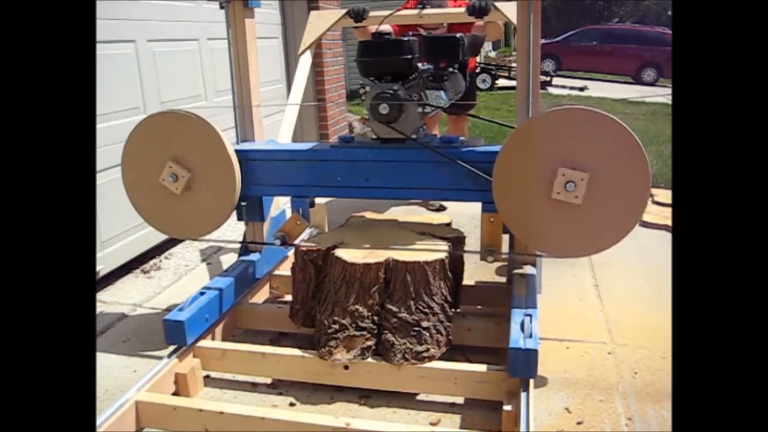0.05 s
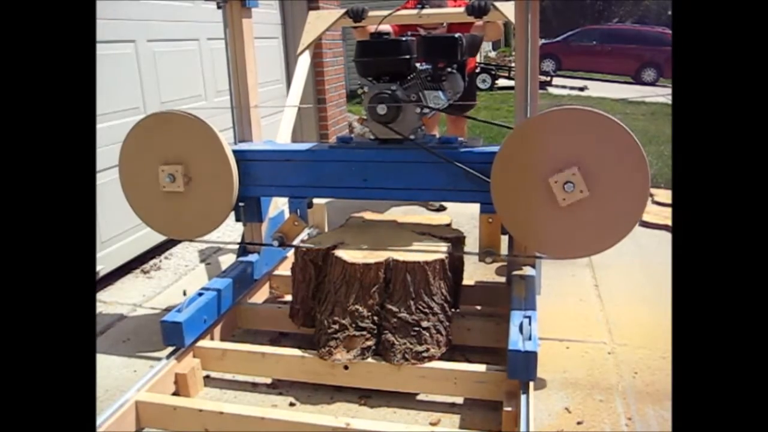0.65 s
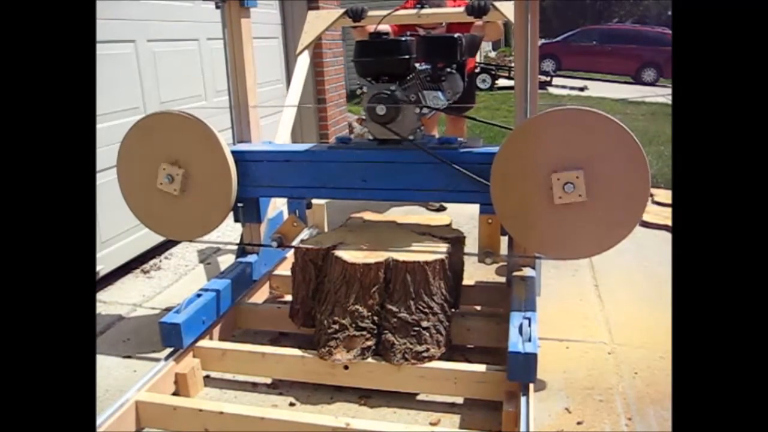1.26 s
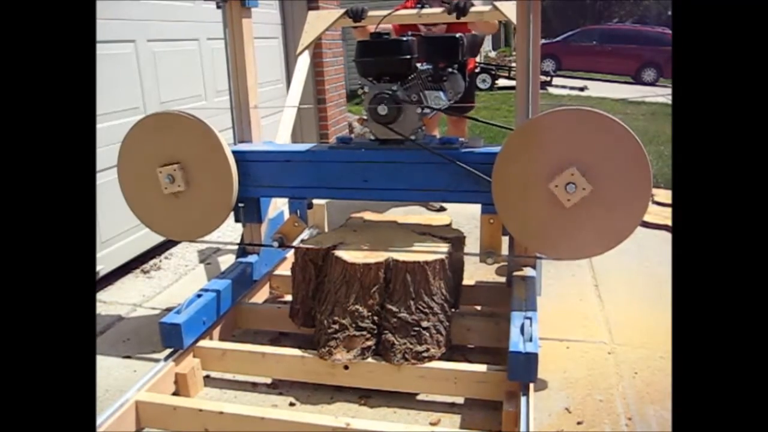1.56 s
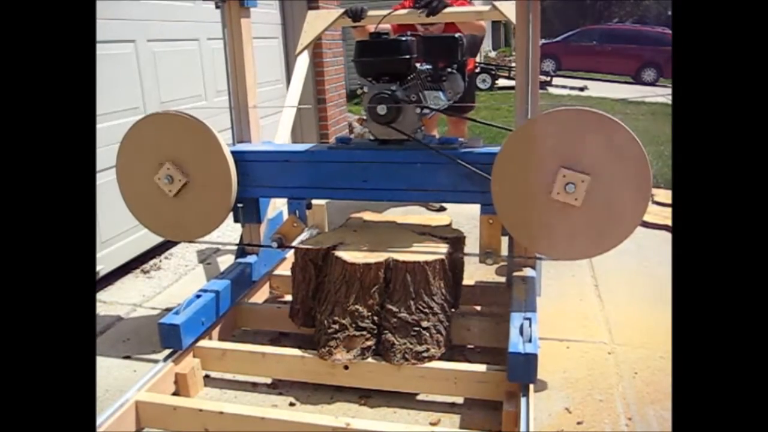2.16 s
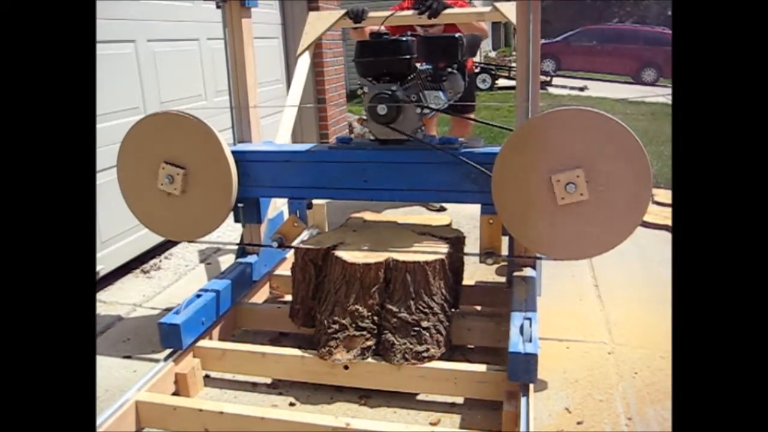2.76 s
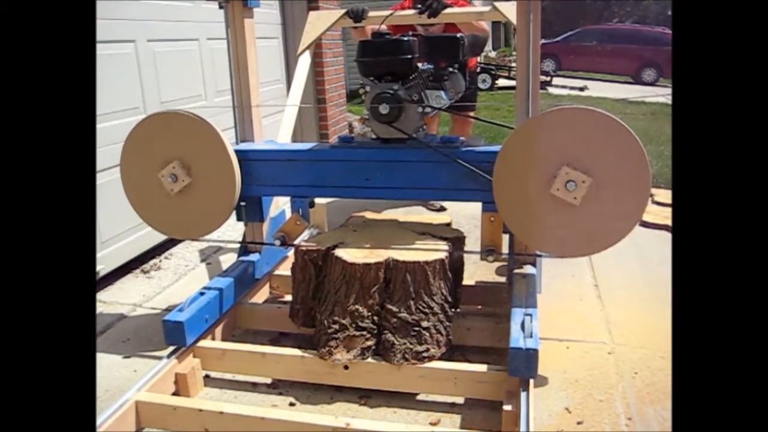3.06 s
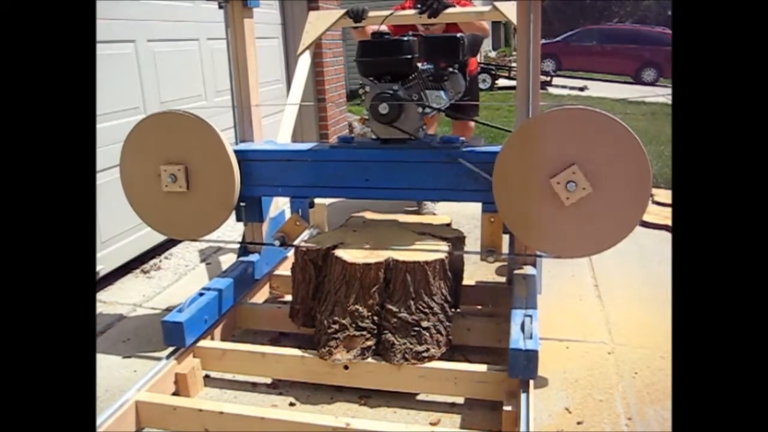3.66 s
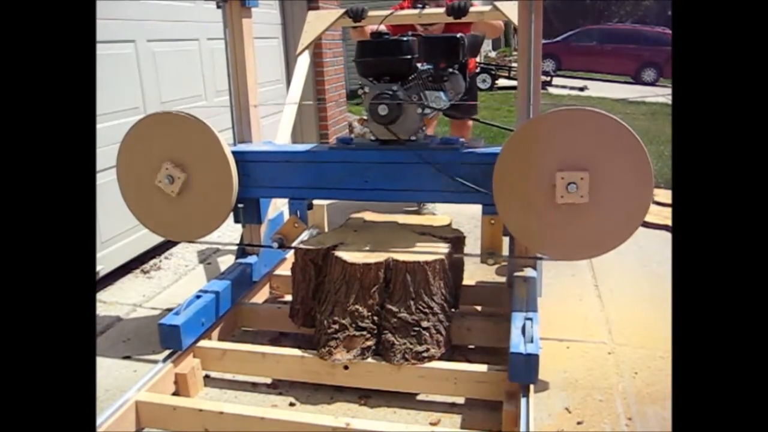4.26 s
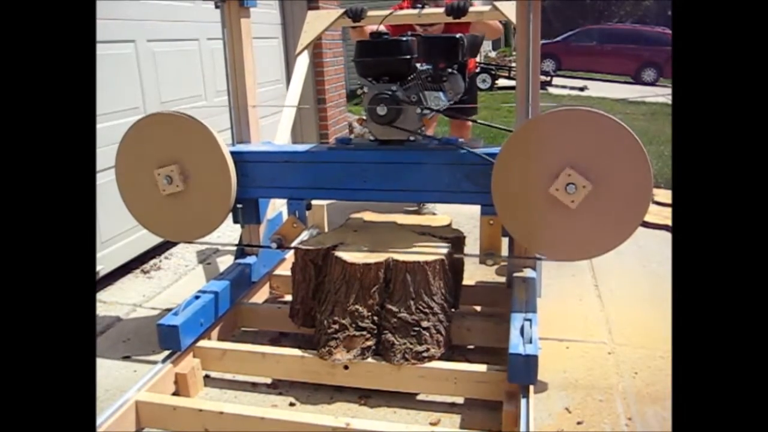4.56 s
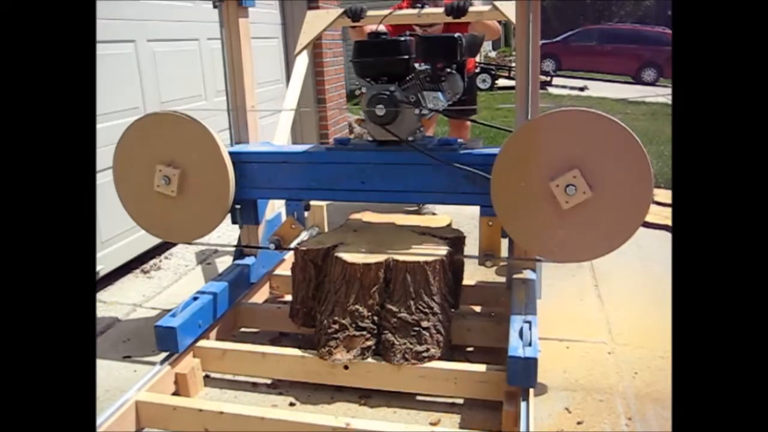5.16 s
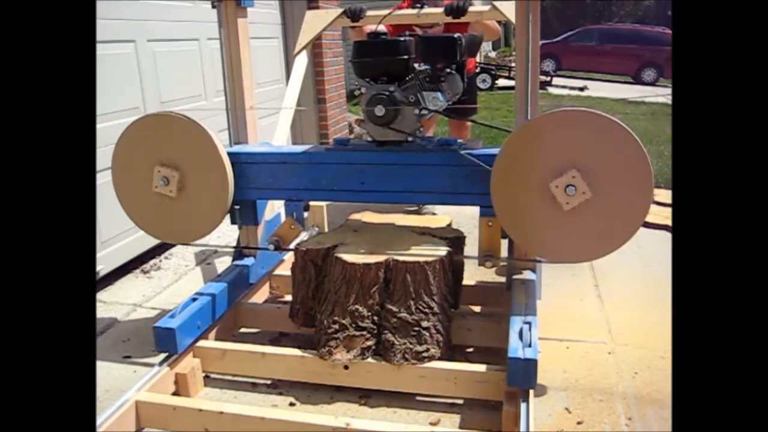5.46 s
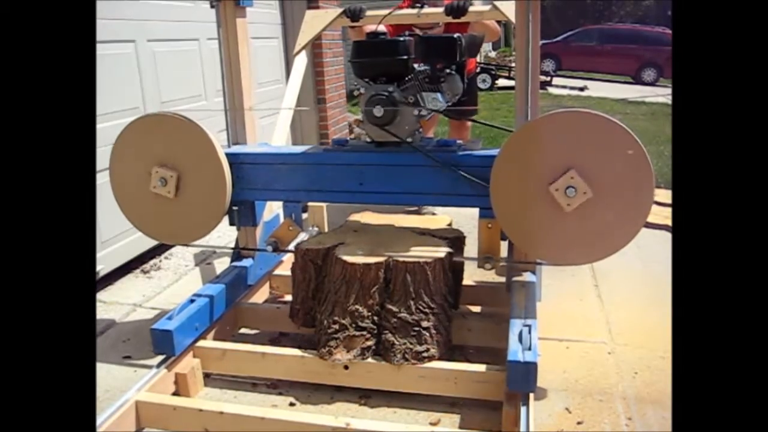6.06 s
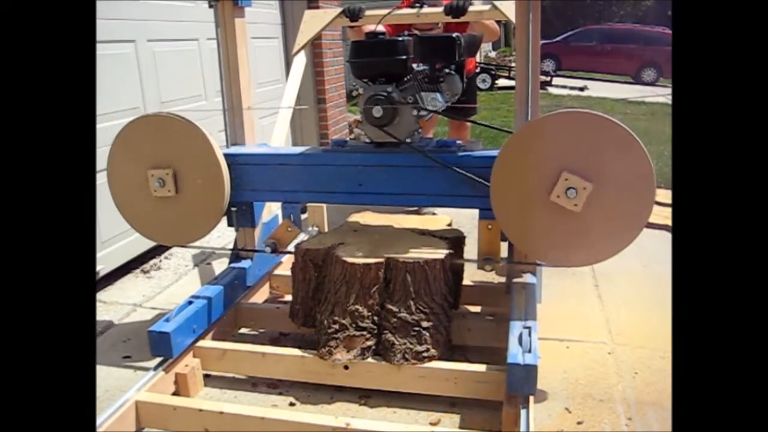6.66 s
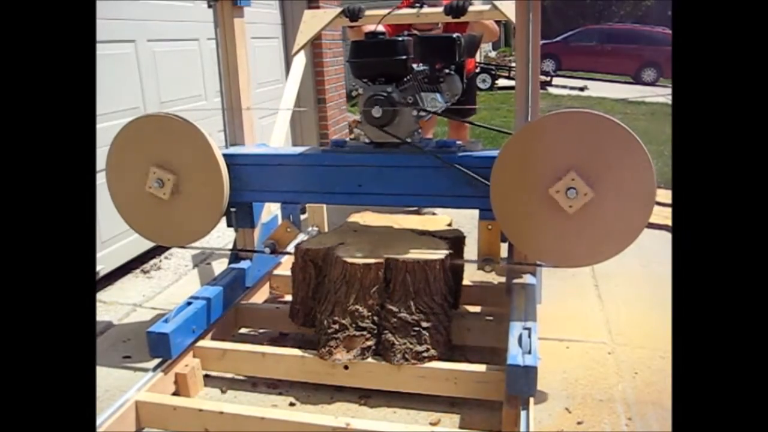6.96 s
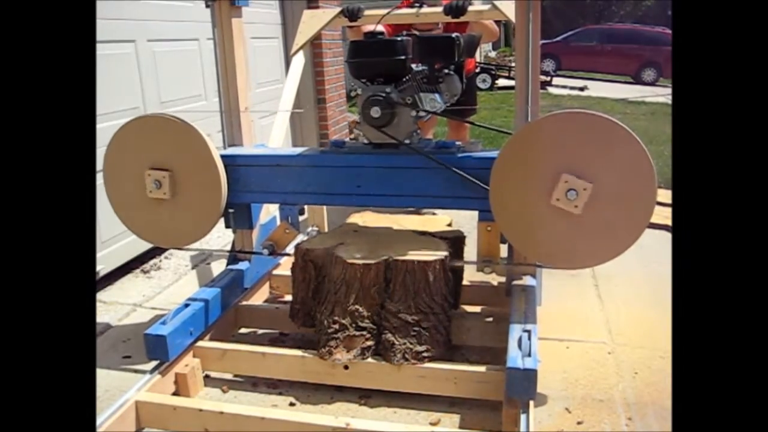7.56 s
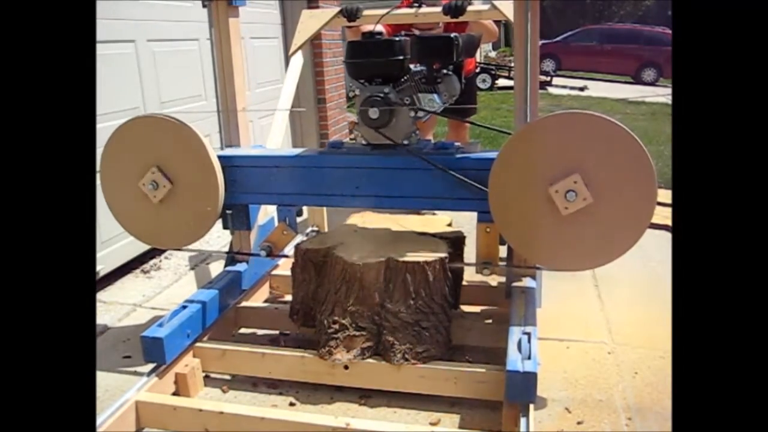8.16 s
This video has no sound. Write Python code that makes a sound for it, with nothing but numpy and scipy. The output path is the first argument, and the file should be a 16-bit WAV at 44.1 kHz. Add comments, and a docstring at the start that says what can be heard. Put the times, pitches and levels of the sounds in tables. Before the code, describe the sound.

A small single-cylinder petrol engine pops and clatters close by outdoors, driving a band saw through a log. From the start the steel blade hisses, rasps and rings, with brief high squeals and short knocks. A scrape sinks in pitch from about 0.6 to 1.3 seconds, followed by two bright skids. Around 1.8 seconds another falling scrape begins and the engine slows. From 2.2 to 2.6 seconds the blade binds: the hiss drops away, wood crunches, the steel squeals and knocks, and the engine nearly stalls before picking up. A bright rubbing hiss follows until about 4.5 seconds, easing into smoother cutting with a thin, high whine. The engine gradually regains full speed under the hiss, and scattered light knocks and an occasional squeak continue until the end at about 8.3 seconds.

```python
"""Engine-driven band saw in a log

A single-cylinder four-stroke petrol engine pops and clatters outdoors, driving a wooden band saw.
Tooth impacts and friction make the steel band hiss and ring; it skids with a brighter rub, and once binds:
it knocks, squeals and drags the engine almost to a stall before the speed comes back.
A fast gain control holds the level: the engine ducks under each skid and swells when the hiss dies."""
import sys
import numpy as np
from scipy import signal
from scipy.fft import rfft, irfft
from scipy.io import wavfile
from scipy.ndimage import minimum_filter1d, map_coordinates

SR = 44100
rng = np.random.default_rng(int(sys.argv[2]) if len(sys.argv) > 2 else 0)


def unload_audio(sound):
    """Save the sound as a 16-bit wav file, at the path given as the first command line argument."""
    columns = np.transpose(np.atleast_2d(sound))
    # keep every value between -1 and 1, then stretch to whole-number steps
    steps = np.round(np.clip(columns, -1, 1) * 32767)
    wavfile.write(sys.argv[1], SR, steps.astype(np.int16))


N = 366912
TIME = np.arange(N) / SR


def from_db(db):
    """Amplitude ratio of a level in decibels."""
    return 10 ** (np.asarray(db) / 20)


def unit_rms(x):
    """Normalisation to unit power."""
    return x / np.sqrt(np.mean(x ** 2) + 1e-20)


def curves(rows):
    """Linear interpolation of each column against the first, time, at every sample."""
    times, *columns = np.transpose(rows)
    return [np.interp(TIME, times, column) for column in columns]


def trapezoid(start, end, attack_s, release_s):
    """Trapezoidal envelope: rises towards 1 from start and releases from end."""
    return np.clip(np.minimum((TIME - start) / attack_s, 1 - (TIME - end) / release_s), 0, 1)


def lagged(x, seconds, start=0):
    """First-order lag: exponential relaxation towards x."""
    keep = np.exp(-1 / (seconds * SR))
    return signal.lfilter([1 - keep], [1, -keep], x, zi=[keep * start])[0]


def drift(rate):
    """Smooth random modulation of unit power, changing about rate times a second."""
    knots = rng.standard_normal(8192)
    coarse = TIME[::int(SR / (12 * rate)) + 1]
    spline = map_coordinates(knots, [coarse * rate], order=3, mode="wrap")
    return unit_rms(np.interp(TIME, coarse, spline))


def grains(per_s, spread_db):
    """Shot noise: dense, tiny impacts of uneven size."""
    sizes = from_db(spread_db * np.minimum(rng.exponential(1, N), 4)) * rng.choice([-1, 1], N)
    return unit_rms(sizes * (rng.random(N) < per_s / SR))


def narrow_noise(hz, width_hz):
    """Narrow-band noise: a randomly driven resonance whose centre may move."""
    lowpass = signal.butter(2, width_hz / 2, fs=SR, output="sos")
    envelope = signal.sosfilt(lowpass, rng.standard_normal(N) + 1j * rng.standard_normal(N))
    carrier = np.exp(2j * np.pi * np.cumsum(hz * np.ones(N)) / SR)
    return unit_rms((envelope * carrier).real)


def lift_db(hz, modes):
    """Lorentzian resonance peaks in decibels; a negative lift is a notch."""
    return sum(lift / (1 + (2 * (hz - centre) / width) ** 2) for centre, width, lift in modes)


def body(x, spectrum, modes=(), size=8192):
    """Source-filter model: a minimum-phase body with broad colour and narrow resonances; unit power."""
    hz = np.maximum(np.fft.rfftfreq(size, 1 / SR), 1)
    points_hz, points_db = np.transpose(spectrum)
    db = np.interp(np.log(hz), np.log(points_hz), points_db) + lift_db(hz, modes)
    gain = from_db(db) * np.minimum(hz / points_hz[0], 1)   # long waves are hardly radiated
    cepstrum = irfft(np.log(gain))[:size // 2]
    response = irfft(np.exp(rfft(2 * cepstrum, size)))[:size // 2]
    return unit_rms(signal.oaconvolve(x, response)[:N])


def pings(times, modes, decay_s, spread_db, detune):
    """Damped free vibration: each light contact rings one mode at random; unit power."""
    age = TIME[:SR // 16]
    decay = np.exp(-age / decay_s)
    out = np.zeros(N + len(age))
    for t, (pick, size, shift) in zip(times, rng.random((len(times), 3))):
        start = int(t * SR)
        hz = modes[int(pick * len(modes))][0] * (1 + detune * (2 * shift - 1))
        out[start:start + len(age)] += from_db(spread_db * size) * decay * np.sin(2 * np.pi * hz * age)
    return unit_rms(out[:N])


# Firing rate of the engine: t/s, f/Hz
FIRING_RATE = [(0.0, 23.88), (1.8, 21.25), (2.25, 13.3), (2.43, 13.32), (2.5, 21.81), (2.75, 21.24),
               (3.48, 20.96), (3.71, 22.47), (4.2, 21.58), (4.72, 21.56), (4.94, 22.57), (5.12, 22.45),
               (5.61, 23.48), (5.82, 22.9), (6.45, 23.76), (7.05, 23.99), (7.85, 23.87), (8.32, 24.2)]
def engine_motion():
    """Phase is the integral of frequency: the firing rate and the running count of engine cycles."""
    firing_hz, = curves(FIRING_RATE)
    return firing_hz, np.cumsum(firing_hz) / SR - 0.13


def labouring(firing_hz):
    """Load slows the engine: 0 while it runs easily, 1 close to the stall."""
    return np.clip((21.5 - firing_hz) / 3.8, 0, 1)


def surge(cycles, at, depth_db):
    """Amplitude modulation by the power stroke, peaking at the given fraction of each cycle."""
    return from_db(depth_db * np.cos(2 * np.pi * (cycles - at)))


# Puffs and valve knocks within one cycle: phase/cycles, level/dB, decay/cycles
STROKE_PULSES = [(.2, -2, 0.22), (.47, -23, 0.085), (.66, -7, 0.064), (0.961, -7, 0.17)]
def strokes(cycles, uneven_db):
    """Cycle-to-cycle variation: an envelope of decaying pulses, each of slightly different strength."""
    out = 0
    for at, db, decay in STROKE_PULSES:
        cycle, age = np.divmod(cycles - at, 1)
        strength = from_db(db + uneven_db * rng.uniform(-1, 1, 512))
        out = out + strength[cycle.astype(int)] * np.exp(-age / decay)
    return out


# Modes of the wooden frame: f/Hz, relative level/dB, decay/s
WOOD_MODES = [(128, -13, 0.018), (168, -8, 0.012), (202, -17, 0.014), (354, -9, 0.013)]
def thumps(cycles, firing_hz):
    """Impulse response: near the stall each firing is a separate blow on the frame."""
    age = TIME[:SR // 5]
    ring = sum(from_db(db) * np.exp(-age / decay) * np.sin(2 * np.pi * hz * age)
               for hz, db, decay in WOOD_MODES)
    firings = np.diff(np.floor(cycles), prepend=np.floor(cycles[0]))
    return from_db(-44) * signal.oaconvolve(firings * labouring(firing_hz) ** 2, ring)[:N]


# Throttle position: t/s, opening (0 shut, 1 wide open)
THROTTLE_OPENING = [(0, 0.95), (.5, 0.63), (.9, 0.87), (2.55, 1), (2.7, 0), (3.45, 0.05), (3.65, 0.87),
                    (4.2, 1), (5.3, 0.95), (6.3, 0.84)]
# Harmonics of the firing rate: order, relative level/dB with the throttle shut, half open, wide open
EXHAUST_HARMONICS = [(1, -24, -27, -28), (2, -12, -12.5, -11.5), (3, -19, -28, -20), (4, -20, -23, -25),
                     (5, -16, -14, -20), (6, -11, -13, -13), (7, -16, -19.5, -15), (8, -9.5, -11.5, -15),
                     (9, -13, -17, -16.5), (10, -20, -22.5, -7.5), (11, -13, -13.5, -10),
                     (12, -21, -14.5, -12), (13, -22, -18, -8.5), (14, -14.5, -6.5, -12),
                     (15, -18, -14, -22), (16, -11, -12, -18.5), (17, -23, -9, -11), (18, -17, -12, -18),
                     (19, -34, -11.5, -15), (20, -18, -19, -15), (21, -23, -12, -18), (22, -16, -19, -33),
                     (23, -10, -6, -12.5), (24, -25, -6, -12)]
# Muffler resonances: f/Hz, width/Hz, lift/dB
MUFFLER_RESONANCES = [(171, 20, 3), (380, 20, 8.5), (485, 36, 2.5)]
# Spectrum of the escaping gas: f/Hz, relative level/dB
PUFF_SPECTRUM = [(60, -13), (110, -20), (180, -8), (280, -8.5), (390, -0.5), (500, 5), (650, -8.5),
                 (1000, -2), (2500, -43)]
def exhaust(cycles, firing_hz):
    """Periodic pops form a harmonic series that sweeps through the muffler resonances, over puffs."""
    step = 8   # samples per computed point of the note
    phase = (cycles - 0.97 + 0.0018 * drift(25))[::step]   # zero as the exhaust valve opens
    throttle = curves(THROTTLE_OPENING)[0][::step]
    note = 0
    for order, *levels_db in EXHAUST_HARMONICS:
        lag = 0.34 * rng.uniform(-0.82, 1)   # the pipe smears the harmonics, in periods
        db = np.interp(throttle, [0, 0.5, 1], levels_db)
        db += lift_db(order * firing_hz[::step], MUFFLER_RESONANCES)
        db += 1.5 * (order > 2) * drift(5)[::step]
        note = note + from_db(db) * np.cos(2 * np.pi * (order * phase + lag))
    note = unit_rms(np.interp(TIME, TIME[::step], note))
    puffs = body(rng.standard_normal(N) * (strokes(cycles, uneven_db=2) + 0.34), PUFF_SPECTRUM)
    return from_db(-1.5 - 9 * labouring(firing_hz)) * note + from_db(-5) * puffs


# Spectrum radiated by the engine's shell: f/Hz, relative level/dB
SHELL_SPECTRUM = [(200, -30), (500, -11), (750, -1.5), (1100, -2), (1700, 0.5), (2300, -3.5), (3200, -0.5),
                  (4200, -5.5), (7000, -15), (15000, -43)]
# Modes of the shell: f/Hz, width/Hz, lift/dB
SHELL_MODES = [(1035, 68, 3.5), (1186, 56, 5.5), (1433, 21, 3.5), (2020, 10, 3.5), (2100, 59, 6.5),
               (2286, 58, 1.5), (2475, 320, 5), (2930, 99, 3)]
def clatter(cycles):
    """Structure-borne sound: valve gear, belt and frame shake the shell, hardest on the power stroke."""
    force = surge(cycles, at=0.64, depth_db=1.5) * (2.5 + 0.4 * strokes(cycles, uneven_db=3))
    force *= from_db(0.81 * drift(70))
    return body(grains(per_s=7000, spread_db=2) * force, SHELL_SPECTRUM, SHELL_MODES)


def rattle(cycles, at=(0.52, 0.7, 0.77, 0.84), looseness=0.02966):
    """Quasi-periodic impacts: tappets and loose guards tick at much the same points of every cycle."""
    due = (np.arange(int(cycles[-1]))[:, None] + np.array(at)).ravel()
    times = np.interp(due + looseness * rng.standard_normal(len(due)), cycles, TIME)
    return pings(times, SHELL_MODES[1:], decay_s=0.0066, spread_db=2.5, detune=0.043)


# Effort of the engine: t/s, exhaust level/dB, clatter level/dB
ENGINE_LEVELS = [(0, -49, -39), (.9, -51, -40.5), (1.25, -49, -37.5), (1.8, -50, -40.5),
                 (2.0, -48.5, -40.5), (2.3, -55, -42), (2.5, -49, -45), (2.545, -52, -38.5),
                 (2.58, -51, -43), (2.7, -53.5, -41.5), (3.35, -55, -41.5), (3.65, -52.5, -41),
                 (4.15, -53, -39.5), (5, -51.5, -39.5), (8.32, -51, -40)]
def engine(cycles, firing_hz):
    """Superposition of airborne exhaust noise and structure-borne mechanical noise."""
    exhaust_db, clatter_db = curves(ENGINE_LEVELS)
    pops = from_db(exhaust_db) * exhaust(cycles, firing_hz)
    mechanics = from_db(clatter_db) * (clatter(cycles) + from_db(-10.5) * rattle(cycles))
    return pops + mechanics + thumps(cycles, firing_hz)


# The kerf pinches the band: start t/s, end t/s, first f/Hz, final f/Hz, level/dB
KERF_PINCHES = [(0.596, 1.277, 5160, 2537, -46), (1.783, 2.231, 4500, 2710, -42.5)]
def pinch():
    """Sliding friction: wood closing on the band scrapes at a pitch that sinks faster and faster."""
    out = 0
    for start, end, first_hz, final_hz, db in KERF_PINCHES:
        closed = np.clip((TIME - start) / (end - start), 0, 1)
        hz = first_hz + (final_hz - first_hz) * closed ** 3.2
        envelope = from_db(db) * trapezoid(start, end, attack_s=0.23, release_s=0.022)
        out = out + envelope * narrow_noise(hz, width_hz=710)
    return out


# Squeals of the band: start t/s, end t/s, f/Hz, level/dB, waver as a fraction of f
BAND_SQUEALS = [(0.144, 0.18, 11500, -49, .002), (.555, 0.602, 7490, -44, .002),
                (.59, 0.638, 11300, -43, .002), (0.78, .9, 7430, -41, .004), (0.8, 0.823, 4920, -32, 0.016),
                (0.882, 0.91, 5050, -38, .008), (1.0, 1.08, 7450, -42, .002),
                (1.066, 1.12, 5210, -39, .005), (1.133, 1.153, 5200, -41, .005),
                (1.208, 1.25, 3030, -36.5, 0.055), (1.928, 1.95, 13500, -36, .012),
                (1.17, 1.255, 5000, -44.5, 0.0063), (2.317, 2.41, 6430, -48, 0.00086),
                (2.405, 2.474, 6410, -45, 0.0012), (2.47, 2.513, 6400, -46, 0.0033),
                (2.282, 2.483, 12100, -59, .007), (2.462, 2.494, 8800, -44, 0.005),
                (2.46, 2.487, 9330, -51, .008), (3.56, 3.6, 2520, -44, .008), (3.67, 3.7, 2520, -53, .008),
                (3.8, 3.85, 2540, -48, .008), (5.87, 5.923, 4830, -44, 0.01),
                (7.011, 7.047, 2890, -38, 0.0063)]
def squeals(edge_s=0.0081):
    """Stick-slip oscillation locks briefly on to one mode of the band."""
    out, slip, grip = np.zeros(N), drift(230), from_db(2 * drift(50))
    for start, end, hz, db, waver in BAND_SQUEALS:
        span = slice(int(start * SR), int(end * SR))
        phase = 2 * np.pi * np.cumsum(hz * (1 + waver * slip[span])) / SR
        envelope = from_db(db) * trapezoid(start, end - edge_s, edge_s, edge_s)[span]
        out[span] += envelope * np.sqrt(2) * np.sin(phase)
    return out * grip


# Snagging teeth: t/s, relative thud level/dB, relative spit level/dB, decay/s
TOOTH_SNAGS = [(.226, -25, -38, .005), (.718, -27, -39, .005), (0.763, -28, -38, .005),
               (.98, -24, -39, 0.0062), (1.096, -24, -36, 0.0037), (1.111, -36, -18.5, 0.0041),
               (1.16, -29, -29, 0.0094), (1.296, -25, -28, .004), (1.431, -34, -15, .0057),
               (1.478, -33, -17.5, 0.0029), (1.521, -29, -31, .005), (1.618, -34, -17.5, 0.0046),
               (1.856, -31, -42, 0.0062), (2.264, -14, -28, 0.0013), (2.401, -26, -54, 0.0024),
               (2.511, -24, -21, 0.005), (2.569, -46, -37, .0091), (2.619, -37, -31, 0.0028),
               (3.525, -43, -24, .003), (4.157, -37, -15.5, .0025), (4.5, -40, -29, 0.0027),
               (4.784, -33, -23, .0025), (5.302, -23, -40, .003), (5.994, -26, -40, .004),
               (6.493, -30, -40, 0.0031), (6.631, -24.5, -40, .0034), (6.672, -25, -40, 0.0022),
               (6.799, -28, -32, 0.0043), (6.836, -27, -42, .005), (6.877, -23, -42, .002),
               (7.04, -28, -42, 0.0031), (7.585, -33, -40, 0.0042), (8.134, -26, -40, .004)]
# Spectra of struck wood and struck steel: f/Hz, relative level/dB
WOOD_SPECTRUM = [(250, -5.5), (500, -18), (1000, -11.5), (2700, 4), (4500, 3.5), (7000, -5.5), (15000, -56)]
STEEL_SPECTRUM = [(2000, 0), (5000, -3), (8500, -2.5), (13000, 1.5), (15700, -31)]
def knocks(rise_s=0.0006):
    """Impact transients: a snagging tooth jolts the wooden frame and makes the band spit."""
    wood, steel = np.zeros(N), np.zeros(N)
    age = TIME[:SR // 8]
    for t, thud_db, spit_db, decay in TOOTH_SNAGS:
        span = slice(int(t * SR), int(t * SR) + len(age))
        blow = (1 - np.exp(-age / rise_s)) * np.exp(-age / decay)
        wood[span] += from_db(thud_db - 1) * blow
        steel[span] += from_db(spit_db - 0.5) * blow
    thuds = wood * body(rng.standard_normal(N), WOOD_SPECTRUM)
    spits = steel * body(rng.standard_normal(N), STEEL_SPECTRUM)
    return thuds + spits


# Chatter of the teeth: t/s, level/dB
CHATTER_LEVEL = [(0, -46), (1.2, -43), (1.4, -54), (3.3, -48), (4.3, -48), (5, -48), (6.6, -44),
                 (8.32, -48)]
# Resonances and notches of a catching tooth: f/Hz, width/Hz, lift/dB
CATCH_MODES = [(2112, 83, -8.5), (2497, 120, -1.5), (2943, 140, -2), (4400, 200, -6), (4940, 160, 3.5)]
def chatter(count=420):
    """Random impulse excitation: each tooth catching in the grain spills grit and rings briefly."""
    times = rng.uniform(0, TIME[-1], count)
    catches = np.zeros(N)
    catches[(times * SR).astype(int)] = from_db(8 * rng.random(count))
    bursts = lagged(catches, seconds=0.0034)
    grit = body(grains(per_s=5000, spread_db=0.5) * bursts, WOOD_SPECTRUM, CATCH_MODES)
    rings = pings(times, CATCH_MODES, decay_s=0.011, spread_db=6, detune=0.019)
    return from_db(curves(CHATTER_LEVEL)[0]) * (grit + from_db(-2.5) * rings)


# The band is bound in the log: start t/s, end t/s, first level/dB, last level/dB
BIND_SPANS = [(2.23, 2.484, -46, -38.5), (2.498, 2.52, -35, -28), (2.52, 2.553, -39, -37),
              (2.568, 2.612, -35, -42), (2.613, 2.626, -34, -30.5)]
# Spectrum of crushed fibres: f/Hz, relative level/dB
CRUNCH_SPECTRUM = [(200, -7), (600, -6), (1050, 3.5), (1500, -1.5), (2500, 2), (3500, -3), (5000, -17),
                   (9000, -30), (15000, -46)]
def groan(cycles):
    """Fracture noise: the bound band crushes fibres in a rasp that builds, breaks and catches again."""
    grip = 0
    for start, end, first_db, last_db in BIND_SPANS:
        db = np.interp(TIME, [start, end], [first_db, last_db])
        grip = grip + from_db(db) * trapezoid(start, end, attack_s=0.004, release_s=0.0074)
    force = surge(cycles, at=1, depth_db=2) * from_db(4 * drift(190))
    return grip * body(grains(per_s=3500, spread_db=3) * force, CRUNCH_SPECTRUM, CATCH_MODES)


def chirps(cycles, firing_hz, per_firing=3.3):
    """Stick-slip pulses: biting teeth let go with tiny squeaks, higher when the band runs fast."""
    hz = 10670 + 894 * np.clip(firing_hz - 22.8, 0, 1)
    age = (per_firing * cycles + 0.11 * drift(60)) % 1
    return from_db(-4) * unit_rms(narrow_noise(hz, width_hz=2100) * age * np.exp(-age / 0.08))


def skid_ring(cycles, skid):
    """Resonant build-up: a long skid slowly wakes two modes, which bend with every power stroke."""
    waver = 1 + 0.005 * drift(7.4) + 0.0095 * np.cos(2 * np.pi * (cycles - 0.74))
    low = from_db(-13) * narrow_noise(4120 * waver, width_hz=480)
    high = from_db(-5.5) * narrow_noise(8520 * waver, width_hz=280)
    envelope = skid ** 0.25 * lagged(skid, seconds=0.46)
    shake = surge(cycles, at=0.74, depth_db=0.5) * from_db(4.2 * drift(120))
    return envelope * shake * (low + high)


# Modes of the steel band: f/Hz, width/Hz, relative level/dB when biting, when gliding
STEEL_MODES = [(7435, 89, -12, -12.5), (7900, 43, -15, -19), (8350, 120, -27, -12), (8670, 150, -14, -20),
               (10180, 140, -12, -31), (10610, 130, -15, -11), (10940, 230, -28, -12.5),
               (11370, 110, -15, -36), (12200, 460, -16, -12), (13600, 200, -28, -24)]
# Whine of the gliding band: t/s, f/Hz, relative level/dB
GLIDE_WHINE = [(4.7, 9050, -10), (5.8, 9200, -5), (7.2, 9110, -11.5), (7.6, 9010, -24), (8.32, 9000, -4)]
def band_ring(bite, glide):
    """Forced vibration: friction keeps the band's modes ringing; they bend as its tension wanders."""
    out, biting, gliding = 0, np.sqrt(bite), np.sqrt(glide)
    for hz, width_hz, bite_db, glide_db in STEEL_MODES:
        mode = signal.butter(2, [hz - width_hz / 2, hz + width_hz / 2], "band", fs=SR, output="sos")
        gain = np.hypot(biting * from_db(bite_db), gliding * from_db(glide_db))
        swell = from_db(2.5 * drift(4))
        out = out + gain * swell * unit_rms(signal.sosfilt(mode, rng.standard_normal(N)))
    whine_hz, whine_db = curves(GLIDE_WHINE)
    out += gliding * from_db(whine_db) * narrow_noise(whine_hz, width_hz=160)
    pitch_ratio = 1 + 0.0016 * drift(4)
    return map_coordinates(out, [np.cumsum(pitch_ratio)], order=5, mode="mirror")


def tooth_plucks(count=500):
    """Free vibration: single teeth pluck the band's lower modes, which ring briefly."""
    times = rng.uniform(0, TIME[-1], count)
    return pings(times, STEEL_MODES[:6], decay_s=0.014, spread_db=14, detune=0.012)


# The band skids on its side: start t/s, end t/s, release/s
SKID_SPANS = [(1.3, 1.413, 0.059), (1.523, 1.594, 0.032), (2.6, 4.255, .85)]
# Freedom of the band in the kerf: t/s, share (0 biting, 1 gliding)
KERF_FREEDOM = [(0, 0.032), (1.7, 0.29), (2.5, 0.66), (4.9, 0.89), (6, .92), (8.32, 1)]
def contact(attack_s=0.0049):
    """Friction regimes: the shares of biting, skidding and gliding, which add up to 1."""
    skids = sum(trapezoid(start, end, attack_s, release) for start, end, release in SKID_SPANS)
    skid = np.clip(skids, 0, 1) ** 2
    free, = curves(KERF_FREEDOM)
    return (1 - skid) * (1 - free), skid, (1 - skid) * free


def band_drive(cycles, firing_hz, bite, skid, unloaded_hz=25.13):
    """Amplitude modulation: the band flutters sideways and power strokes jerk it as load slows it."""
    flutter_hz = firing_hz * (3.3 * bite + 3.7 * (1 - bite)) * (1 + 0.0205 * drift(26))
    flutter = 1 + 0.09 * (1 - 0.16 * skid) * np.cos(2 * np.pi * np.cumsum(flutter_hz) / SR)
    jerk_db = -1.65 + 0.92 * np.clip(unloaded_hz - firing_hz, 0, 2.5)
    crank_turns = 2 * cycles
    return flutter * surge(cycles, at=0.87, depth_db=jerk_db) * surge(crank_turns, 0.6, jerk_db)


# Force of the cut, dying away as the kerf grips the band: t/s, hiss level/dB, rasp level/dB
CUT_LEVELS = [(0, -32, -38.5), (.6, -32, -36), (.95, -34.5, -36), (1.28, -40, -37.5), (1.3, -27.3, -34),
              (1.43, -27, -32.5), (1.46, -39, -38), (1.51, -38, -39), (1.535, -28.5, -35),
              (1.6, -30.5, -34), (1.64, -34.5, -40), (1.7, -35.5, -36), (1.85, -38, -38),
              (1.95, -30.5, -36), (2.18, -38.5, -39), (2.38, -56.5, -55), (2.55, -50, -42), (2.6, -47, -43),
              (2.65, -31.5, -42.5), (4, -30.5, -36), (5, -31, -39.5), (8.32, -31, -38)]
# Spectra of rasping teeth and of biting, skidding and gliding steel: f/Hz, relative level/dB
RASP_SPECTRUM = [(1500, -18), (3000, -7.5), (4100, 2.5), (5500, 3.5), (6800, 2), (8000, -12), (11000, -42),
                 (15500, -7)]
BITE_SPECTRUM = [(4000, -8.5), (6800, -4), (7500, 0), (8500, -3), (9500, 3.5), (10600, -1.5), (11700, 0.5),
                 (12500, -6), (13200, -3), (15700, -20)]
SKID_SPECTRUM = [(4000, -21.5), (6500, -1.5), (8000, 0), (8450, 5), (9300, 4), (10500, 3.5), (12000, 5),
                 (13300, 2), (14600, -1), (15700, -20)]
GLIDE_SPECTRUM = [(4000, -19), (6900, -6.5), (7500, 0.5), (8500, 0), (9800, 0.5), (10900, -4), (11500, -7),
                  (12600, -16), (13200, -6), (14300, -10), (15700, -15)]
# Resonances of the skidding band: f/Hz, width/Hz, lift/dB
SKID_RESONANCES = [(7460, 68, 2.5), (8400, 170, 4.1), (14900, 200, 4)]
def band(cycles, firing_hz):
    """Friction noise: teeth tear fibres and the steel hisses, coloured by how it lies in the kerf."""
    bite, skid, glide = contact()
    drive = band_drive(cycles, firing_hz, bite, skid)
    force = unit_rms(drive * from_db(0.57 * drift(70) + drift(500)))
    tearing = grains(per_s=16000, spread_db=2.5) * drive * from_db(1.58 * drift(110))
    rasp = from_db(3 * skid) * body(tearing, RASP_SPECTRUM)
    hiss = from_db(-13) * tooth_plucks() * np.sqrt(1 - skid)
    hiss += band_ring(bite, glide) * force + skid_ring(cycles, skid)
    # a fading skid catches again on each power stroke
    catch = surge(cycles, at=0.92, depth_db=2 * np.sin(np.pi * skid))
    for share, gain, spectrum, modes in ((bite, from_db(-1.5), BITE_SPECTRUM, ()),
                                         (skid, from_db(4) * catch, SKID_SPECTRUM, SKID_RESONANCES),
                                         (glide, from_db(-1), GLIDE_SPECTRUM, ())):
        friction = grains(per_s=20000, spread_db=0.5) * force
        hiss += np.sqrt(share) * gain * body(friction, spectrum, modes)
    hiss += bite * chirps(cycles, firing_hz)
    hiss_db, rasp_db = curves(CUT_LEVELS)
    return from_db(rasp_db) * rasp + from_db(hiss_db) * hiss


def scene():
    """Superposition at one point: engine and saw stand close together, alike in both channels."""
    firing_hz, cycles = engine_motion()
    motor = engine(cycles, firing_hz)
    saw = band(cycles, firing_hz) + pinch() + groan(cycles) + chatter() + squeals() + knocks()
    return np.tile(motor + saw, (2, 1))


def gain_control(x, target_db=-29, max_gain_db=11.5, attack_s=0.00088, hold_s=0.012, release_db_s=183):
    """Automatic gain control: gain falls as the treble-weighted level rises, holds, then recovers."""
    sensed = signal.lfilter([1, -0.59], [1], x) ** 2
    power = lagged(sensed, seconds=0.015, start=sensed[:SR // 20].mean())
    excess_db = np.maximum(10 * np.log10(power + 1e-12) - target_db, -max_gain_db)
    half_hold = int(hold_s * SR / 2)
    held_db = -minimum_filter1d(-excess_db, 2 * half_hold + 1, origin=half_hold)
    recovery_db = release_db_s * TIME
    cut_db = np.maximum.accumulate(held_db + recovery_db) - recovery_db
    return from_db(-lagged(cut_db, attack_s, start=cut_db[0]))


def record(dry):
    """Band limiting and compression: deep bass is lost, gain rides the level, peaks round, top is cut."""
    low_cut_hz, high_cut_hz, peak_limit = 28, 15800, 0.26
    heard = signal.sosfilt(signal.butter(4, low_cut_hz, "high", fs=SR, output="sos"), dry)
    levelled = peak_limit * np.tanh(heard * gain_control(heard[0]) / peak_limit)
    return signal.sosfilt(signal.ellip(12, 0.1, 80, high_cut_hz, fs=SR, output="sos"), levelled)


dry = scene()
out = record(dry)
unload_audio(out)
```